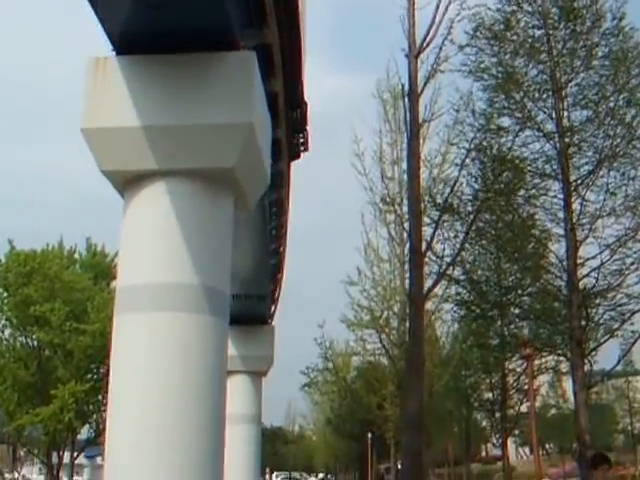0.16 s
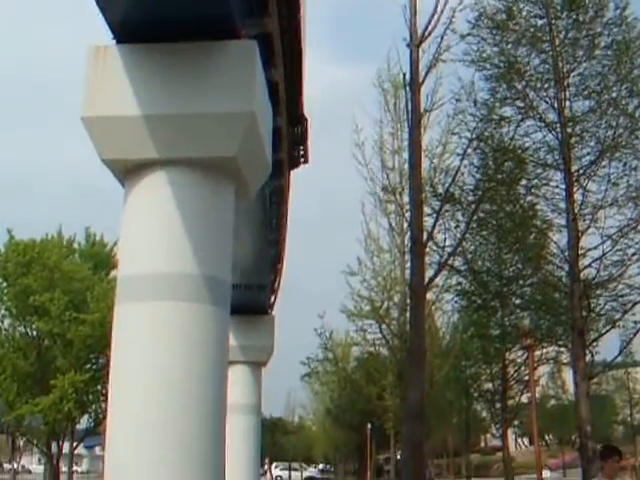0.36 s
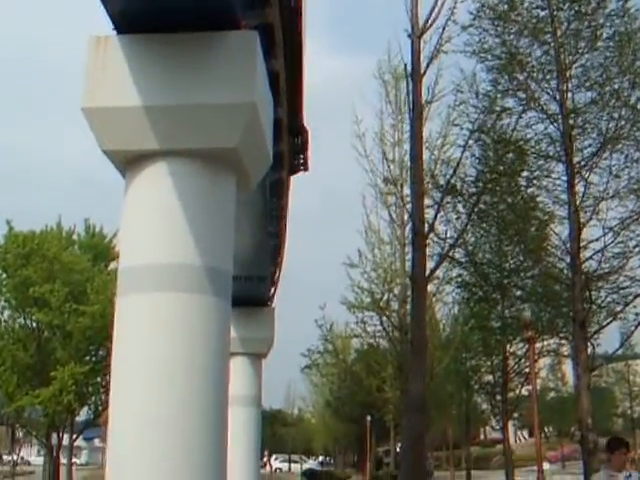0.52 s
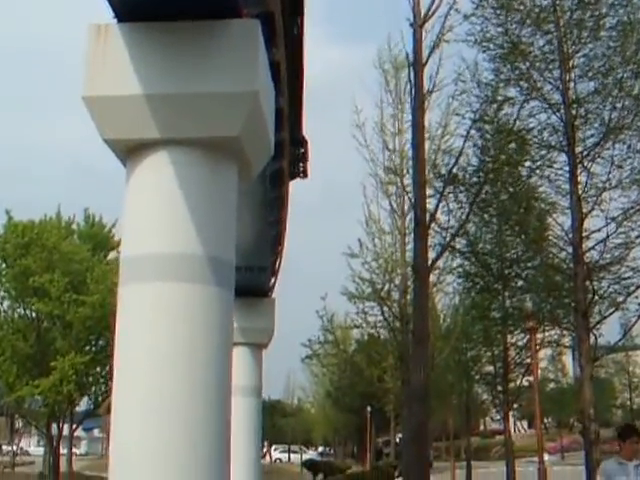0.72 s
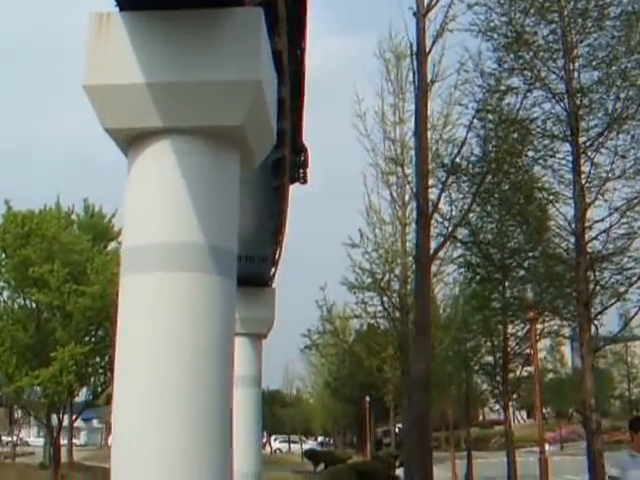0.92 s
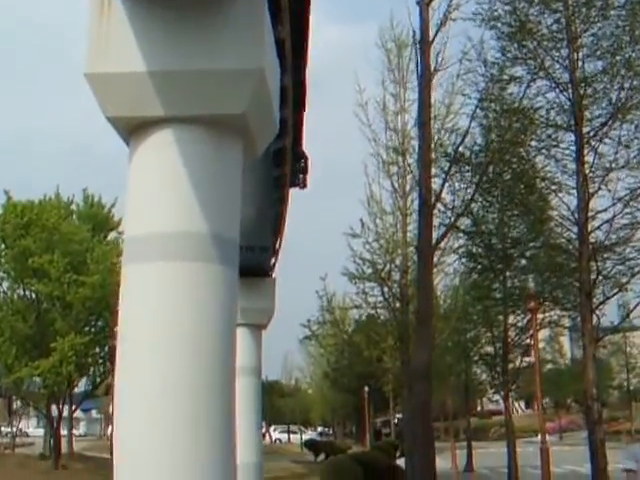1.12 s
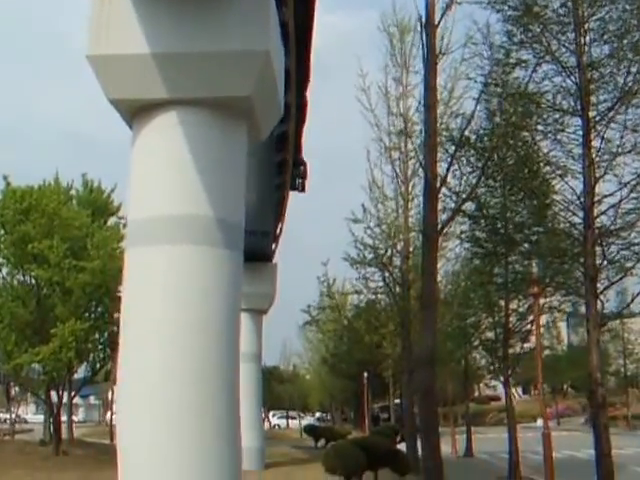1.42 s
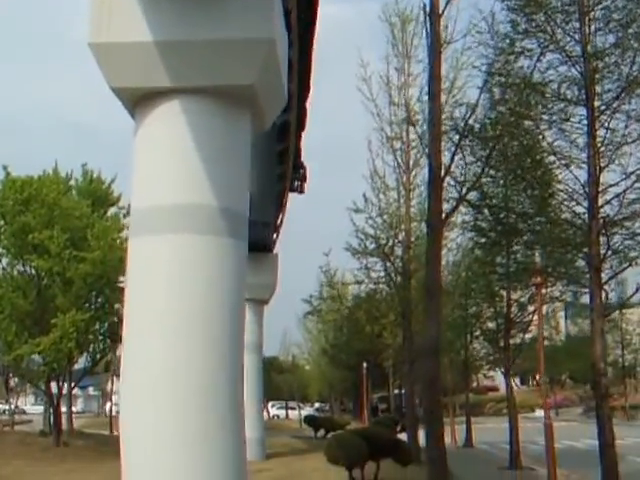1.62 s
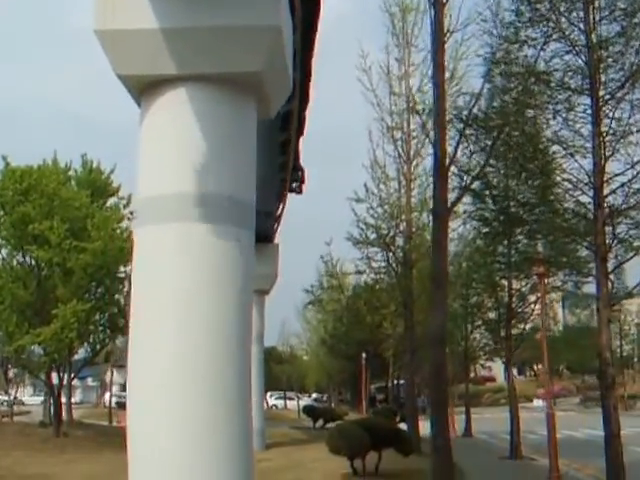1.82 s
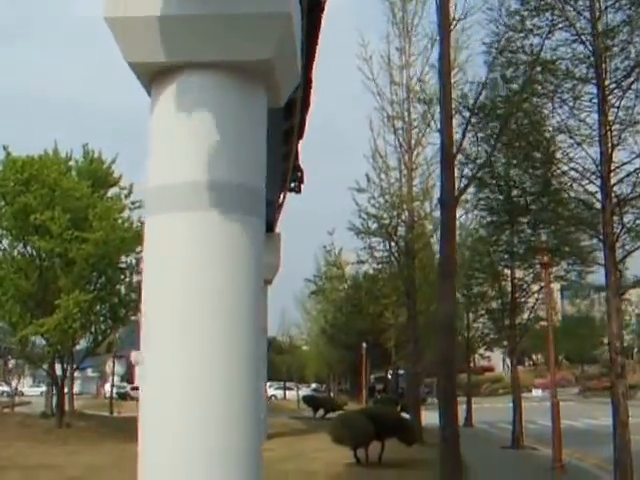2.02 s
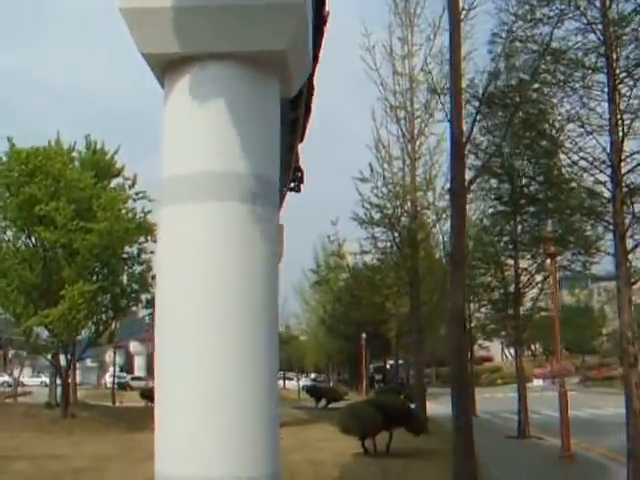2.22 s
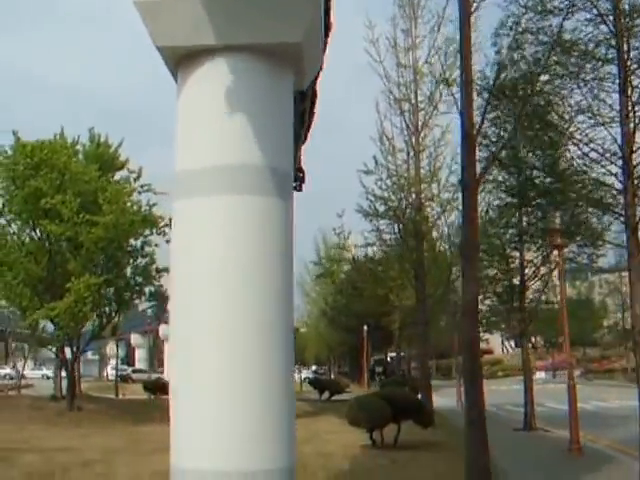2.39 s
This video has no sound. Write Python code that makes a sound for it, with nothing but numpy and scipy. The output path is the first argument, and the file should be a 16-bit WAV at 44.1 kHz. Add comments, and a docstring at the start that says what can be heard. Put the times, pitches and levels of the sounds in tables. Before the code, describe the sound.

High-pitched motor whine from a train on an overhead track, with a soft rumble beneath.

```python
"""A park below an elevated guideway, where a maglev train runs. Its inverters switch at a randomly
hopping rate, so the motors sing a band of whine with overtones, scattered by pillars and trees.
Under it lie a low hum, thin tones, and the rumble and hiss of train and town. A high ring stands out
once, a few soft scuffs sound nearby and wind nudges the microphone."""
import sys
import numpy as np
from scipy import signal
from scipy.fft import rfft, irfft
from scipy.io import wavfile
from scipy.ndimage import uniform_filter1d

SR = 44100
rng = np.random.default_rng(int(sys.argv[2]) if len(sys.argv) > 2 else 0)


def dump(signal):
    """Clip the signal to [-1, 1] and save it as 16-bit WAV at the path in sys.argv[1]."""
    limited = np.clip(np.atleast_2d(signal).T, -1, 1)
    pcm = np.round(limited * 32767).astype(np.int16)
    wavfile.write(sys.argv[1], SR, pcm)


N = 112454
CARRIER_HZ = 2297.3  # centre of the switching band


def motor_whine(motors=4, low_trim_db=-0.5, high_trim_db=-0.86):
    """Motors sing at their switching rates; the two halves of the band swell and fade separately."""
    # lower half of the band (time [s], level before trim [dB])
    low_levels = [(0.02, -34.5), (0.08, -25.5), (0.11, -33), (0.43, -36), (0.46, -32), (0.49, -35),
                  (0.92, -31), (1.01, -36), (1.28, -30.5), (1.29, -27), (1.5, -37), (1.8, -34.5),
                  (1.82, -30.5), (2.12, -38), (2.34, -30.5), (2.52, -35)]
    # upper half of the band (time [s], level before trim [dB])
    high_levels = [(0.02, -35), (0.07, -28), (0.1, -36.5), (0.3, -30), (0.4, -34), (0.74, -28.5),
                   (1.11, -34.5), (1.24, -31.5), (1.37, -35.5), (1.4, -31.5), (1.84, -34.5), (1.87, -32),
                   (2.46, -37), (2.52, -45)]
    # switching overtones (multiple, mid-scene level [dB], slope [dB/s])
    overtones = [(2, -38.5, -1.15), (3, -44, -0.9)]
    t = np.arange(N) / SR
    phases = [inverter_phase() for _ in range(motors)]

    def harmonic(k):
        return unit(sum(scatter(np.sin(round(k) * phase)) for phase in phases))

    fundamental = harmonic(1)
    below_carrier = np.fft.rfftfreq(N, 1 / SR) < CARRIER_HZ
    low = irfft(rfft(fundamental) * below_carrier, N)
    whine = unit(low) * undb(low_trim_db + curve(low_levels))
    whine += unit(fundamental - low) * undb(high_trim_db + curve(high_levels))
    return whine + sum(harmonic(k) * undb(db + slope * (t - t.mean())) for k, db, slope in overtones)


def inverter_phase(spread_hz=203, hop_s=0.006, edge_bias=0.72):
    """Phase of a switching rate that hops to a new random value every few milliseconds."""
    t = np.arange(N) / SR
    draws = rng.uniform(-1, 1, N // 16)
    offsets = np.sign(draws) * np.abs(draws) ** edge_bias  # bias < 1 favours the band edges
    hop = (t / hop_s + rng.random()).astype(int)
    hz = CARRIER_HZ + spread_hz * offsets[hop % len(offsets)]
    return 2 * np.pi * np.cumsum(hz) / SR


def scatter(x, t60_s=0.31, tail_db=-1):
    """Direct sound plus a diffuse tail from guideway, pillars and trees."""
    t = np.arange(N) / SR
    tail = rng.standard_normal(N) * np.exp(-np.log(1000) * t / t60_s)
    tail /= np.linalg.norm(tail)
    return x + undb(tail_db) * irfft(rfft(x) * rfft(tail), N)


def overtone_edges():
    """The whine is stronger in a narrow band at each overtone's lower edge."""
    # lower edges of the overtones (centre [Hz], width [Hz], level [dB])
    edge_bands = [(4284, 170, -45.5), (6410, 170, -53)]
    return sum(undb(db) * noise_band(hz, width_hz) for hz, width_hz, db in edge_bands)


def hum(upper_hz=150.8, lower_hz=134.5, lower_db=-4.5, drone_hz=371.4, wander_hz=2.5):
    """Two close low tones beat under a drone; all wander in pitch."""
    # beating pair (time [s], level [dB])
    pair_levels = [(0, -43.5), (.1, -36), (.25, -40.5), (.6, -43), (.74, -35.5), (.92, -46.5), (1.05, -36),
                   (1.17, -46), (1.37, -48), (1.46, -33), (1.6, -45), (1.78, -38), (1.88, -46.5),
                   (2.07, -39.5), (2.25, -41.5), (2.55, -45.5)]
    # drone (time [s], level [dB])
    drone_levels = [(0, -46), (.42, -57.5), (.51, -37.5), (.63, -47), (.72, -38.5), (.9, -43), (1.03, -52),
                    (1.48, -59), (1.63, -37), (1.74, -50.5), (1.95, -40), (2.1, -46), (2.35, -49),
                    (2.55, -37.5)]
    pair = unit(tone(upper_hz, wander_hz) + undb(lower_db) * tone(lower_hz, wander_hz))
    drone = tone(drone_hz, wander_hz)
    return pair * undb(curve(pair_levels)) + drone * undb(curve(drone_levels))


def thin_tones(flutter_db=3.5):
    """Sustained thin tones waver in pitch and level."""
    # tones (frequency [Hz], level [dB], wander [Hz])
    tones = [(211, -49.5, 4), (648, -55.5, 3), (2159, -41, 4), (2222, -45, 9), (2294, -47.5, 3),
             (2460, -47, 9), (7703, -64, 12), (8310, -71, 10)]
    return sum(undb(db) * unit(tone(hz, wander_hz) * undb(flutter_db * walk(rate_hz=9)))
               for hz, db, wander_hz in tones)


def high_ring(width_hz=81):
    """A rough high tone stands out of the whine for a moment."""
    # ring (peak time [s], level [dB], centre [Hz], half-length [s])
    rings = [(.035, -39, 4190, 0.089)]
    return sum(undb(db) * noise_band(hz, width_hz) * swell(at_s, half_s)
               for at_s, db, hz, half_s in rings)


def rumble(level_db=-33, slope_db_per_s=-1, swell_db=-0.14):
    """Rumble of train and town, slowly fading."""
    # rumble spectrum (frequency [Hz], relative density [dB])
    spectrum = [(20, -9), (60, -6), (100, -4), (140, 1), (280, 2), (450, -2), (700, -7.5), (1100, -11.5),
                (1900, -19), (3000, -40.5), (9000, -56.5)]
    t = np.arange(N) / SR
    trend_db = level_db + slope_db_per_s * (t - t.mean())
    return noise(spectrum) * undb(trend_db + swell_db * walk(rate_hz=6.7))


def hiss(flicker_db=0.5):
    """Airy hiss of train and town, flickering slightly."""
    # hiss spectrum (frequency [Hz], relative density [dB])
    spectrum = [(500, -5), (1500, 1.5), (2900, -2.5), (3500, 3.5), (4500, -1.5), (5300, 3.5), (5800, 0),
                (7300, 4), (7900, -4), (8500, -10), (9000, -26)]
    # hiss envelope (time [s], level [dB])
    levels = [(0, -41.5), (1, -40.5), (1.6, -40), (1.85, -38), (2.05, -40), (2.2, -38), (2.36, -39.5),
              (2.43, -44), (2.55, -45)]
    return noise(spectrum) * undb(curve(levels) + flicker_db * walk(rate_hz=40))


def scuffs():
    """Brief soft rubs close to the microphone."""
    # rubs (peak time [s], level [dB], centre [Hz], width [Hz], half-length [s])
    rubs = [(0.254, -41, 3660, 1200, 0.025), (0.484, -35, 3670, 1500, 0.0076), (.49, -46, 1650, 700, 0.015),
            (1.85, -39, 3540, 1010, 0.016), (2.162, -36.5, 4200, 3500, 0.016),
            (2.167, -39, 2590, 300, 0.021), (2.37, -41, 3500, 2000, .02)]
    return sum(undb(db) * noise_band(hz, width_hz) * swell(at_s, half_s)
               for at_s, db, hz, width_hz, half_s in rubs)


def wind():
    """Small gusts thud on the microphone."""
    # gust spectrum (frequency [Hz], relative density [dB])
    spectrum = [(12, -4), (25, -1), (60, -2), (110, -4), (300, -47.5), (1000, -85)]
    # gusts (peak time [s], level [dB], half-length [s])
    gusts = [(1.157, -39, 0.067), (2.133, -34.5, 0.061), (2.31, -40, .05), (2.41, -34, .05),
             (2.514, -35.5, .08)]
    return noise(spectrum) * sum(undb(db) * swell(at_s, half_s) for at_s, db, half_s in gusts)


def undb(db):
    """Decibels to gain."""
    return 10 ** (np.asarray(db) / 20)


def unit(x):
    """Scale to rms 1."""
    return x / np.sqrt(np.mean(x ** 2))


def curve(rows):
    """Join (time [s], value) rows by straight lines."""
    return np.interp(np.arange(N) / SR, *np.array(rows).T)


def swell(at_s, half_s):
    """Gaussian envelope: 1 at at_s, 1/e^2 at half_s either side."""
    return np.exp(-2 * ((np.arange(N) / SR - at_s) / half_s) ** 2)


def walk(rate_hz):
    """Smooth random drift, rms 1."""
    hold = max(int(SR / rate_hz), 2)
    steps = np.repeat(rng.standard_normal(N // hold + 2), hold)
    return unit(uniform_filter1d(uniform_filter1d(steps, hold), hold)[:N])


def tone(hz, wander_hz):
    """Sine of wandering pitch, rms 1."""
    pitch_hz = hz + wander_hz * walk(rate_hz=14)
    return unit(np.sin(2 * np.pi * np.cumsum(pitch_hz) / SR))


def noise(spectrum):
    """Noise shaped by (frequency [Hz], relative density [dB]) rows, rms 1."""
    hz, db = np.array(spectrum).T
    bins_hz = np.maximum(np.fft.rfftfreq(N, 1 / SR), 1)
    gain = undb(np.interp(np.log(bins_hz), np.log(hz), db))
    return unit(irfft(rfft(rng.standard_normal(N)) * gain, N))


def noise_band(hz, width_hz):
    """Steep-sided band of noise, rms 1."""
    detune = 2 * (np.fft.rfftfreq(N, 1 / SR) - hz) / width_hz
    return unit(irfft(rfft(rng.standard_normal(N)) / np.sqrt(1 + detune ** 4), N))


def scene():
    """All sources at one microphone."""
    tonal = motor_whine() + overtone_edges() + hum() + thin_tones() + high_ring()
    return (tonal + rumble() + hiss() + scuffs() + wind())[None]


def record(dry):
    """The recorder cuts the top steeply."""
    cutoff_hz = 8850
    lowpass = signal.ellip(10, 0.2, 80, cutoff_hz, fs=SR, output="sos")
    return signal.sosfilt(lowpass, dry)


dry = scene()
out = record(dry)
dump(out)
```